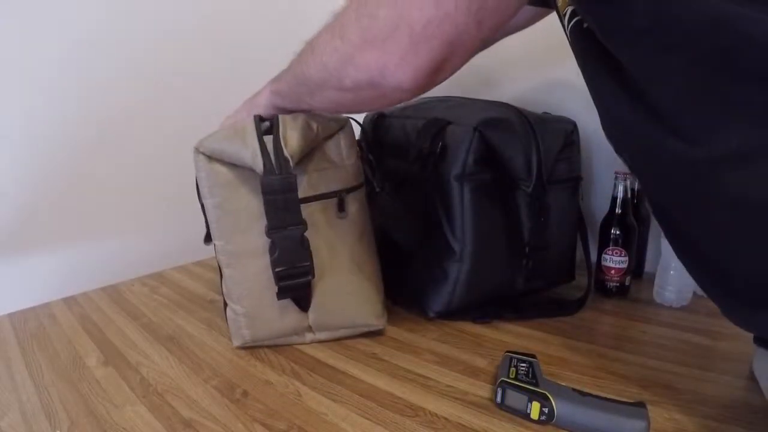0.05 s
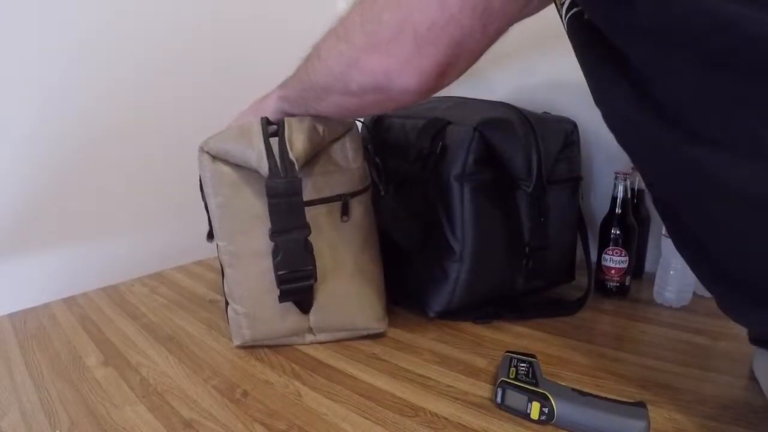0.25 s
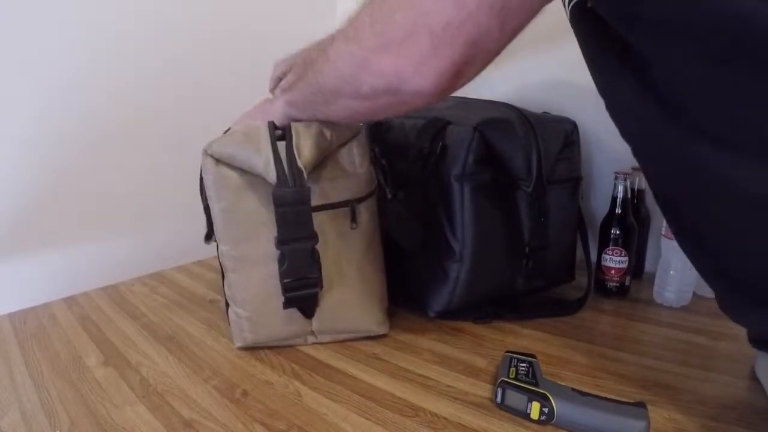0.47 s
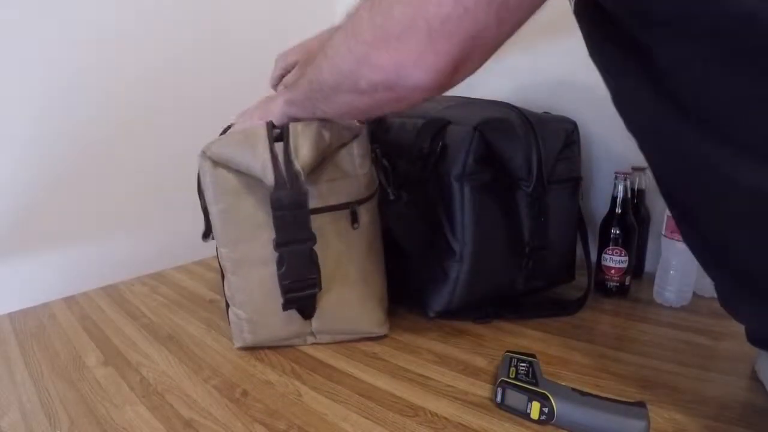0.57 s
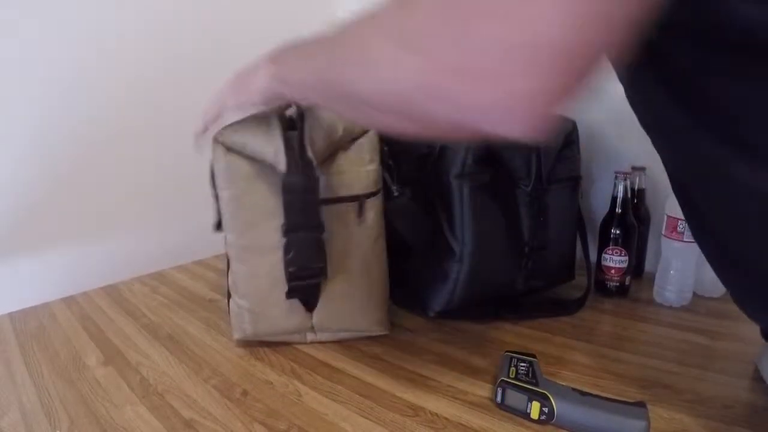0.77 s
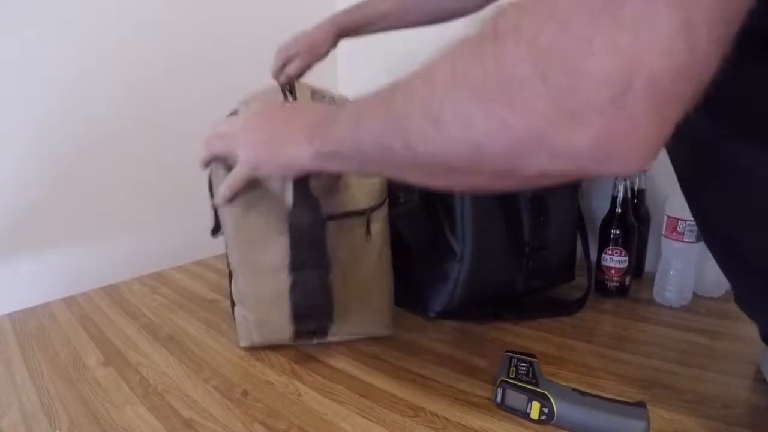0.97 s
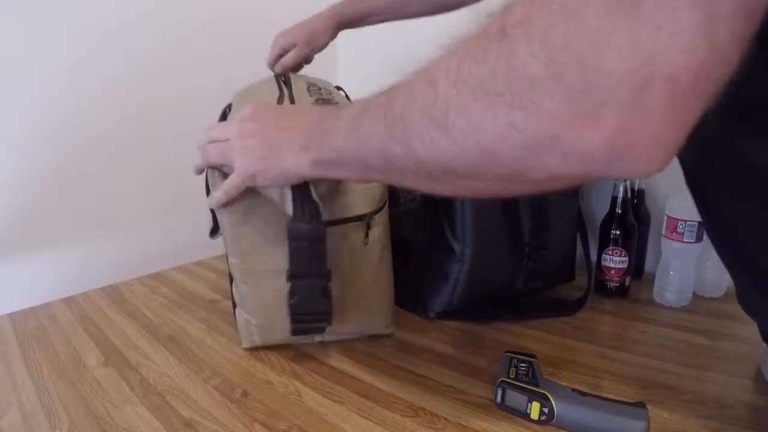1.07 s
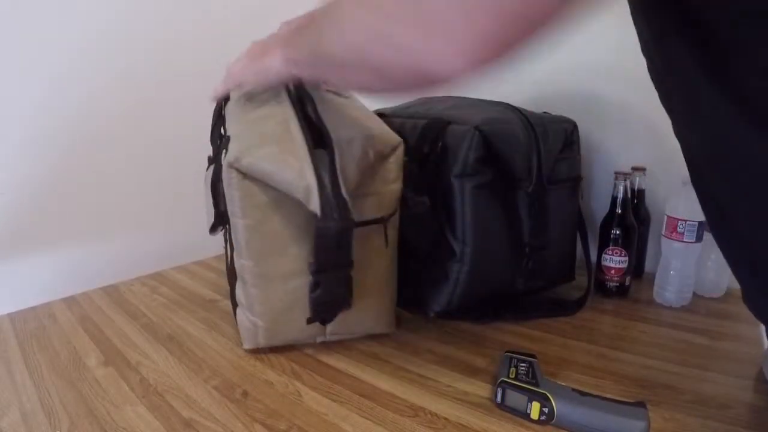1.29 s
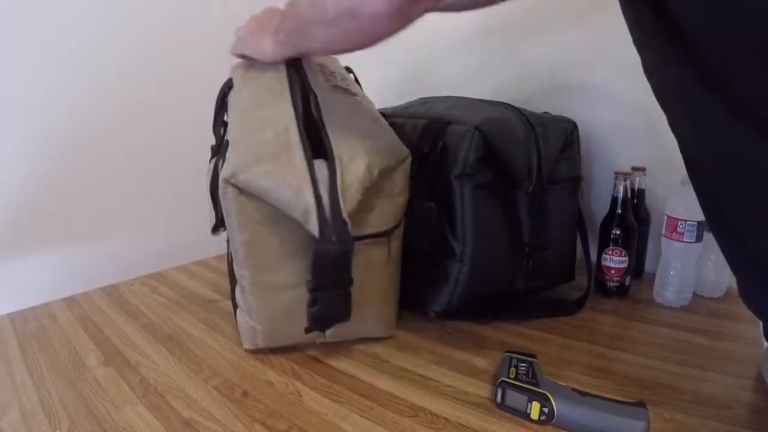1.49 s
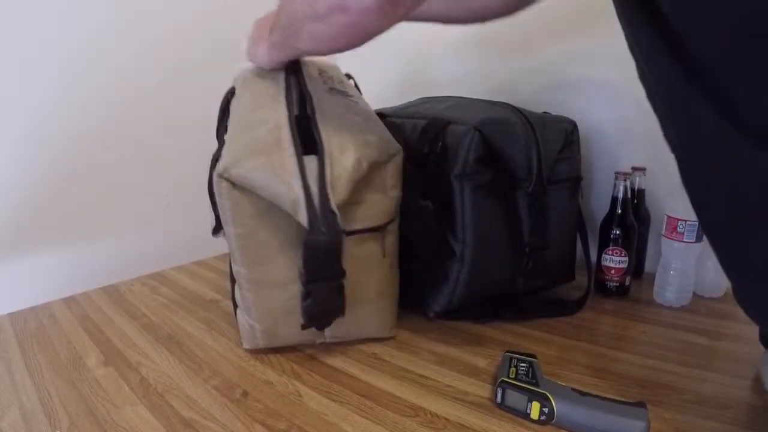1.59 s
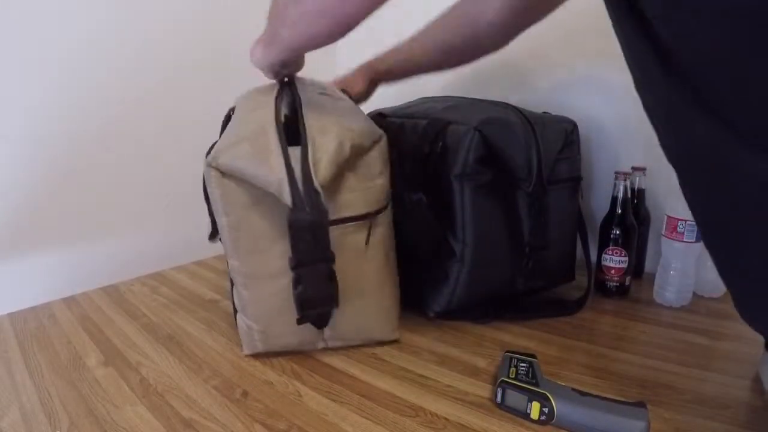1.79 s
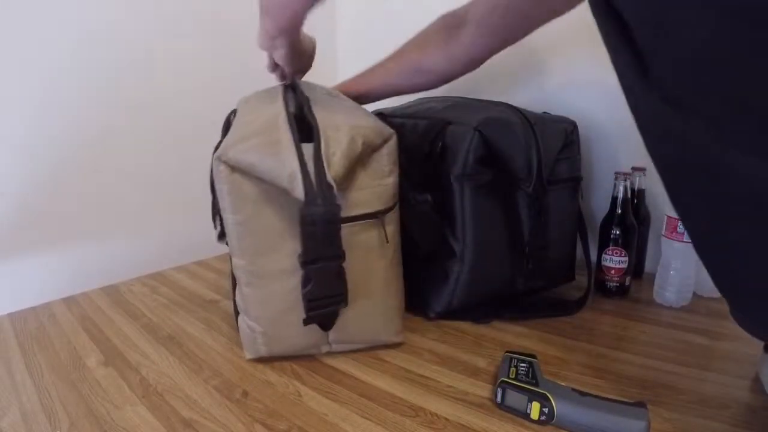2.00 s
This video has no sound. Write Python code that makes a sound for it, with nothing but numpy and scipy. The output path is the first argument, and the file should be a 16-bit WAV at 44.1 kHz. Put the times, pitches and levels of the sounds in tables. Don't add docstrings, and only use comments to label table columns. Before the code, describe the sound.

Stiff cooler bag handled on a wooden table: soft rustle and creaks, a brief loud scraping judder with thumps, more folds knocking and crinkling, then a sharp plastic buckle snap and rattle, close in a small room.

```python
import sys
import numpy as np
from scipy import signal
from scipy.fft import rfft, irfft
from scipy.io import wavfile
from scipy.ndimage import uniform_filter1d

SR = 44100
rng = np.random.default_rng(int(sys.argv[2]) if len(sys.argv) > 2 else 0)


def voltage_ratio(decibels):
    exponent = np.asarray(decibels, float) / 20
    return 10 ** exponent


def master_out(mix):
    frames = np.transpose(np.atleast_2d(mix))
    ceiling = np.clip(frames, -1, 1)
    pcm = np.round(ceiling * 32767).astype(np.int16)
    wavfile.write(sys.argv[1], SR, pcm)


N = 90404
BRIGHT_FROM_HZ = 5900


def level(x, db):
    return x * voltage_ratio(db) / np.sqrt(np.mean(x ** 2))


def curve(table, col=1):
    table = np.array(table)
    return np.interp(np.arange(N) / SR, table[:, 0], table[:, col])


def band(x, hz, width_hz):
    return signal.lfilter(*signal.iirpeak(hz, max(hz / width_hz, .2), fs=SR), x)


def filtered(x, hz, kind):
    return signal.sosfilt(signal.butter(2, hz, kind, fs=SR, output="sos"), x)


def colour(x, table):
    table = np.array(table)
    hz = np.arange(2049) * SR / 4096 + 1
    db = np.interp(np.log(hz), np.log(table[:, 0]), table[:, 1])
    cepstrum = irfft(np.log(voltage_ratio(db)))
    cepstrum[1:2048] *= 2
    cepstrum[2049:] = 0
    return signal.fftconvolve(x, irfft(np.exp(rfft(cepstrum))))[:N]


def walk(rate):
    k = int(SR / rate)
    w = uniform_filter1d(uniform_filter1d(rng.standard_normal(N), k), k)
    return w / w.std()


def grains(per_s, scatter_db):
    chance, sign, size = rng.random((3, N))
    hits = (chance < per_s / SR) * np.sign(sign - .5)
    return level(hits * voltage_ratio(-scatter_db * np.log(1 - size)), 0)


def shape(start, rise, t60):
    t = np.clip(np.arange(N) / SR - start, 0, None)
    attack = np.sin(np.pi / 2 * np.clip(t / max(rise, 1 / SR), 0, 1)) ** 2
    return t, attack * 1000. ** (-np.clip(t - rise, 0, None) / t60)


def rings(rows):
    out = np.zeros(N)
    for s, db, hz, rise, t60 in rows:
        t, env = shape(s, rise, t60)
        out += voltage_ratio(db) * env * np.sin(2 * np.pi * hz * t)
    return out


# (frequency [Hz], level [dB per Hz])
ROOM = [(35, -21.5), (60, 3), (170, -10), (290, -11), (520, -18), (744, -23), (1400, -22.5), (15000, -34)]


def room_tone():
    return filtered(level(colour(rng.standard_normal(N), ROOM), -60), 95, "high")


def table_unrest():
    sway_hz = 36
    unrest = band(band(rng.standard_normal(N), sway_hz, 32), sway_hz, 36)
    return level(unrest, -54) * voltage_ratio(1.5 * walk(4.4))


def camera_whine():
    whine_hz, whine_db, frame_hz = 8646, -84.5, 29.97
    t = np.arange(N) / SR
    gate = 2.9 * np.cos(np.pi * frame_hz * (t - .012)) ** 3
    return voltage_ratio(whine_db) * np.sin(2 * np.pi * whine_hz * t) * gate


# (frequency [Hz], level [dB per Hz])
CLOTH = [(500, -1), (1000, -0.5), (1800, -1.5), (2700, 0.5), (4500, -2), (6000, -5), (7500, -16.5),
         (13000, -23.5)]
# (time [s], level [dB], extra brightness of a fast slide [dB])
SLIDE = [(0, -69.5, 15.5), (.18, -71, -3.5), (.45, -60.5, -10), (.66, -60.5, -12), (.72, -62, 5.5),
         (.85, -59.5, -7), (.95, -62.5, 0), (1.02, -53.5, -5), (1.1, -67.5, 6), (1.2, -58.5, 0.5),
         (1.25, -69.5, 1), (1.39, -73.5, 2), (1.44, -59.5, 7.5), (1.51, -65.5, 11.5), (1.58, -64.5, -4),
         (1.65, -58, -5), (1.88, -63, 4.5), (1.97, -68, 0)]


def rustle():
    hiss = rng.standard_normal(N) * voltage_ratio(1.3 * walk(6.1))
    crinkles = voltage_ratio(-6.5) * grains(900, 1) * voltage_ratio(1.5 * walk(7.1))
    cloth = level(colour(hiss + crinkles, CLOTH), 0)
    high_pass = signal.butter(2, BRIGHT_FROM_HZ, "high", fs=SR, output="sos")
    top = signal.sosfiltfilt(high_pass, cloth)
    return (cloth + top * (voltage_ratio(curve(SLIDE, col=2)) - 1)) * voltage_ratio(curve(SLIDE))


# (time [s], rms level at the start [dB],
# centre [Hz], t60 [s])
CREASES = [(0, -64, 5700, 0.5), (.429, -61, 1280, 0.028), (.301, -57, 1000, .03), (0.477, -54, 2000, .04),
           (.7675, -48, 1200, 0.06), (0.788, -66, 4000, 0.014), (0.83, -64, 5000, 0.014),
           (0.8417, -49, 3600, 0.021), (.855, -54, 3000, 0.036), (1.157, -51, 1500, 0.026),
           (1.206, -56, 2640, 0.023), (1.4065, -62, 1000, 0.1), (1.6113, -46, 4600, .013),
           (2.03, -62, 800, 0.2), (2.015, -63, 2500, 0.99), (.93, -56, 2000, 0.015),
           (1.643, -57, 5300, .12), (1.012, -50, 3550, 0.02)]


def creases():
    noise = filtered(rng.standard_normal(N), 6500, "low")
    out = np.zeros(N)
    for s, db, hz, t60 in CREASES:
        burst = band(band(noise, hz, 1.3 * hz), hz, 1.8 * hz)
        out += level(burst, db) * shape(s, 0.00027, t60)[1]
    return out


# (resonance [Hz], width [Hz], level [dB])
BODY = [(98.7, 23.5, 0), (170, 52, -4), (251, 41.3, -1.5), (330, 90, -3), (383.3, 61, 0), (480, 62, -4),
        (590, 120, -13), (1000, 410, -21.5)]
# (time [s], level [dB])
PRESSURE = [(0, -69), (.25, -56.5), (.27, -53), (.43, -43), (.52, -32), (.6, -41.5), (.7, -51.5),
            (.92, -54), (1.0, -47), (1.09, -54), (1.22, -57.5), (1.28, -72.5), (1.39, -62.5), (1.46, -57),
            (1.57, -62), (1.7, -54), (1.93, -65), (2.02, -55)]


def creak():
    slipping = grains(350, 1.5) + 0.91 * rng.standard_normal(N)
    push = slipping * voltage_ratio(2.63 * walk(14.5))
    body = np.zeros(N)
    for k, (hz, width_hz, db) in enumerate(BODY):
        body += (-1) ** k * voltage_ratio(db) * band(push, hz, width_hz)
    return level(band(body, 219, 460), 0) * voltage_ratio(curve(PRESSURE))


# (time [s], peak level [dB], pitch [Hz], rise [s], t60 [s])
SWAYS = [(.05, -46.5, 57.5, 0.076, 1), (.193, -28.5, 33.3, 0.0094, 0.65), (.52, -40.5, 64.5, 0.012, 0.32),
         (.59, -38.5, 35.3, 0.021, .3), (1.0, -46, 34.4, 0.036, 0.82), (1.125, -43.5, 26.6, 0.016, 0.94),
         (1.43, -54, 43.3, 0.018, 0.15), (1.82, -45, 33.7, 0.034, 0.5)]


def sways():
    return rings(SWAYS)


# (time [s], peak level [dB], pitch [Hz], rise [s], t60 [s])
KNOCKS = [(.11, -55, 278, 0.0024, .05), (.152, -56, 203, .002, .05), (.201, -42, 230, 0.0019, 0.041),
          (.415, -33.5, 109.3, 0.052, 0.13), (.53, -42, 119.6, 0.023, 0.18),
          (.518, -27.5, 267.6, 0.0053, 0.11), (.585, -27, 340, 0.0033, 0.031),
          (.545, -32.5, 249, .004, .08), (.612, -36, 258, 0.0044, .06), (.65, -38, 330, 0.0032, 0.067),
          (.7335, -31.5, 169, 0.0022, 0.052), (.7385, -36.5, 330, .002, 0.039),
          (.767, -38, 640, 0.001, 0.016), (.776, -45, 560, .004, .12), (.775, -43, 376, 0.0025, 0.087),
          (.842, -38, 418, 0.002, 0.022), (.957, -38.5, 164, 0.0076, 0.077),
          (1.072, -37.5, 310, 0.0011, 0.028), (1.158, -46, 352, 0.0022, 0.029),
          (1.205, -46.5, 317, 0.005, 0.029), (1.4068, -36, 190, 0.0017, 0.035),
          (1.42, -43, 166.4, .006, .1), (1.475, -40.5, 292, 0.0025, 0.04), (1.524, -50, 279, 0.0055, 0.072),
          (1.6112, -34.5, 185, 0.0016, 0.03), (1.648, -36.5, 227, 0.0037, 0.044),
          (1.688, -38.5, 330, 0.0025, 0.056), (1.832, -42.5, 184, 0.0034, 0.055),
          (1.989, -45, 400, 0.0028, 0.044), (2.03, -49, 300, .004, .1)]


def knocks():
    return rings(KNOCKS)


# (time [s], peak level [dB])
SLIPS = [(.265, -45.5), (.284, -45), (.301, -39), (.316, -41.5), (.336, -43.5), (.351, -42.5), (.371, -42),
         (.388, -44), (.429, -45.5), (.442, -36.5), (.457, -37)]
# (frequency [Hz], level [dB], t60 [s])
SLIP_MODES = [(245, -3, 0.085), (429, 1, .06), (617, -11, .04)]


def slips():
    rise_s, pitch_spread = 0.0023, 0.054
    off = 1 + pitch_spread * rng.standard_normal((len(SLIPS), len(SLIP_MODES)))
    rows = []
    for i, (s, slip_db) in enumerate(SLIPS):
        for k, (hz, db, t60) in enumerate(SLIP_MODES):
            rows.append((s, slip_db + db, hz * off[i, k], rise_s, t60))
    return rings(rows)


# (time [s], peak level [dB], pitch [Hz], rise [s], t60 [s])
TICKS = [(.301, -48, 716, 0.00092, 0.018), (.43, -50.5, 1290, .001, .025), (.477, -43, 2200, .001, .012),
         (.4765, -48.5, 3000, .001, .01), (.486, -39.5, 2260, 0.0015, .014),
         (.4895, -48.5, 2150, .001, .012), (.505, -41, 2960, 0.0012, 0.016),
         (.496, -34.5, 900, .001, 0.016), (.504, -34, 993, 0.0018, 0.021), (.4975, -41, 1300, .001, .014),
         (.5045, -37, 1490, 0.00074, .02), (.519, -43.5, 1240, 0.0014, 0.018),
         (.517, -47.5, 2950, .001, 0.015), (.531, -44, 2900, .001, .012), (.545, -44, 877, 0.0024, 0.033),
         (.767, -49, 1150, 0.0007, 0.01), (.7695, -49, 1930, .001, .014), (.852, -56.5, 5800, 0.0033, .04),
         (1.0118, -45, 3170, .0008, .008), (1.0138, -36.5, 3640, 0.0011, 0.009),
         (1.0142, -43, 2590, 0.0011, 0.007), (1.013, -44.5, 4700, 0.00072, 0.008),
         (1.061, -38.5, 3610, 0.0013, 0.012), (1.0612, -50, 2350, .0006, .007),
         (1.047, -52, 4970, 0.0022, .012), (1.137, -53, 3380, .001, .015), (1.424, -57, 2450, .003, 0.017),
         (1.432, -57.5, 2650, .006, .025), (1.435, -56, 4500, .003, .018), (1.445, -57, 2070, .005, .03),
         (1.46, -65, 740, 0.17, 0.93), (1.6097, -43.5, 1120, .0006, 0.011),
         (1.6105, -47, 2900, .0006, .012), (1.6108, -50, 3750, .0006, .012),
         (1.628, -56, 12900, .001, .012), (2.03, -72, 12500, .004, .3)]


def ticks():
    return rings(TICKS)


# (frequency [Hz], level [dB per Hz])
SCRAPE = [(500, -5.5), (950, -1), (1400, -1), (1800, -11.5), (2300, -8), (3000, -7), (4000, -17),
          (9000, -38)]


def scrape():
    start_s, rise_s, t60_s = 0.458, 0.058, 0.27
    drag = rng.standard_normal(N) + 0.68 * grains(700, 3.95)
    rough = level(colour(drag, SCRAPE), -42.5) * voltage_ratio(1.4 * walk(62))
    return rough * shape(start_s, rise_s, t60_s)[1]


# (time [s], pitch [Hz], level [dB])
JUDDER = [(.472, 400, -44), (.478, 391, -29), (.4835, 385, -17), (.487, 406, -32.5), (.490, 418, -20.5),
          (.498, 359, -13), (.503, 432, -19.5), (.508, 451, -16.5), (.516, 450, -42.5)]


def judder():
    t = np.arange(N) / SR
    begun = t > JUDDER[0][0]
    on = uniform_filter1d(1. * begun * (t < JUDDER[-1][0]), size=99)
    phase = 2 * np.pi * np.cumsum(curve(JUDDER) * begun) / SR
    gain = uniform_filter1d(voltage_ratio(curve(JUDDER, col=2)), size=45)
    overtone = voltage_ratio(-26) * np.sin(2 * phase)
    return on * gain * (np.sin(phase) + overtone)


# (mode [Hz], level [dB], t60 [s])
BUCKLE = [(4500, 0.5, 0.02), (4900, 5.5, 0.011), (5300, 2, 0.015), (5600, -7, 0.014), (6780, -7.5, 0.016),
          (9440, -9.5, 0.013), (12800, -21, .012)]
# (time [s], level [dB], crack relative to the ring [dB], extra level of the upper modes [dB])
SNAPS = [
    (1.6096, -50.5, 5, 12),
    (1.612, -39.5, -14, -7.5),
]


def buckle():
    out, noise = np.zeros(N), rng.standard_normal(N)
    crack = level(band(band(noise, 2400, 7200), 3000, 11000), 0)
    for s, snap_db, crack_db, upper_db in SNAPS:
        for hz, db, t60 in BUCKLE:
            mode_db = snap_db + db + upper_db * (hz > BRIGHT_FROM_HZ)
            out += rings([(s, mode_db, hz, .0005, t60)])
        out += voltage_ratio(snap_db + crack_db) * crack * shape(s, 0.00014, 0.017)[1]
    grit = noise * (0.51 + np.abs(uniform_filter1d(noise[::-1], size=60)) * 7.7)
    rattle, width_hz = np.zeros(N), 780
    for hz, db, _ in BUCKLE:
        rattle += voltage_ratio(0.5 * db) * level(band(band(grit, hz, width_hz), hz, width_hz), 0)
    s, snap_db = SNAPS[-1][:2]
    return out + level(rattle, snap_db - 16) * shape(s, 0.0064, 0.44)[1]


def room_echo(air):
    tail = band(rng.standard_normal(N), 1700, 3300) * shape(0.003, 0.0045, 0.68)[1]
    return signal.fftconvolve(air, tail / np.sqrt(np.sum(tail ** 2)))[:N] * voltage_ratio(-14.5)


def scene():
    air = rustle() + creases() + ticks() + buckle()
    wood = creak() + sways() + knocks() + slips() + scrape() + judder()
    background = room_tone() + table_unrest() + camera_whine()
    return (air + room_echo(air) + wood + background)[None]


def roll_off(x):
    return signal.sosfilt(signal.butter(12, 15750, fs=SR, output="sos"), x)


def record(dry):
    top_cut = signal.ellip(10, .2, 70, 15300, fs=SR, output="sos")
    mix = signal.sosfilt(top_cut, dry)
    return roll_off(mix)


dry = scene()
out = record(dry)
master_out(out)
```